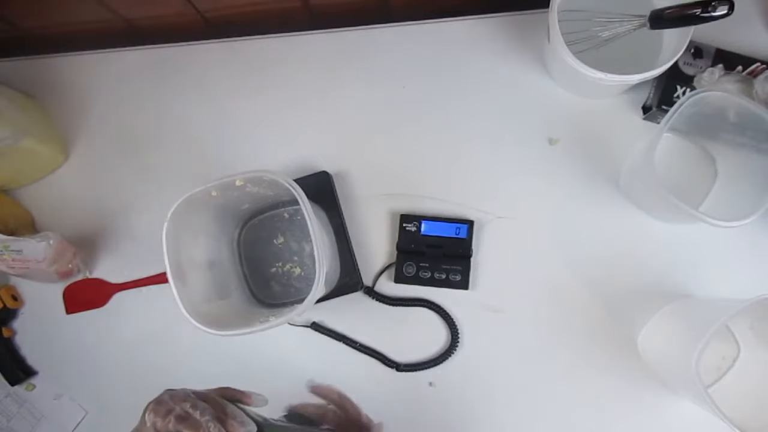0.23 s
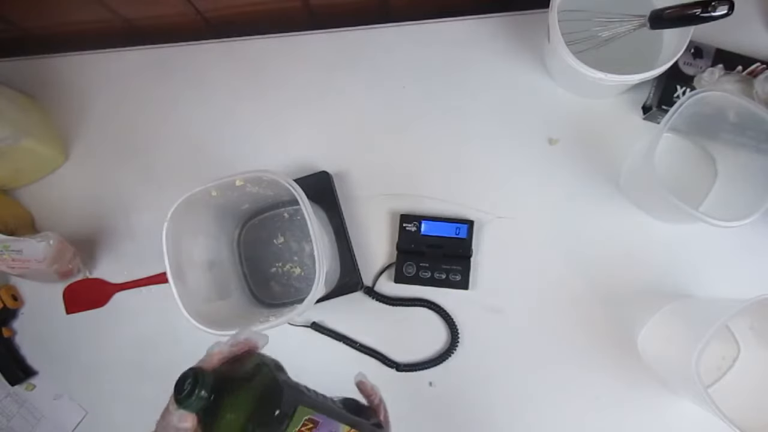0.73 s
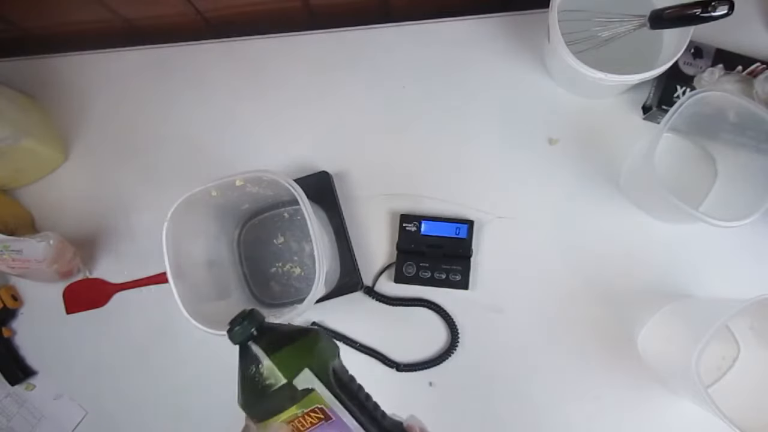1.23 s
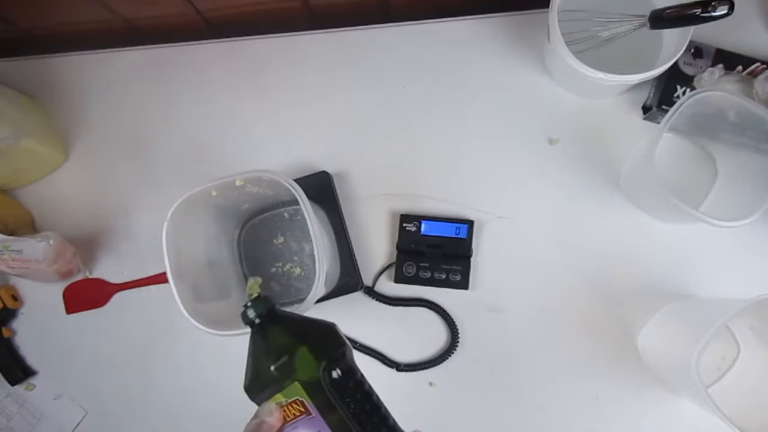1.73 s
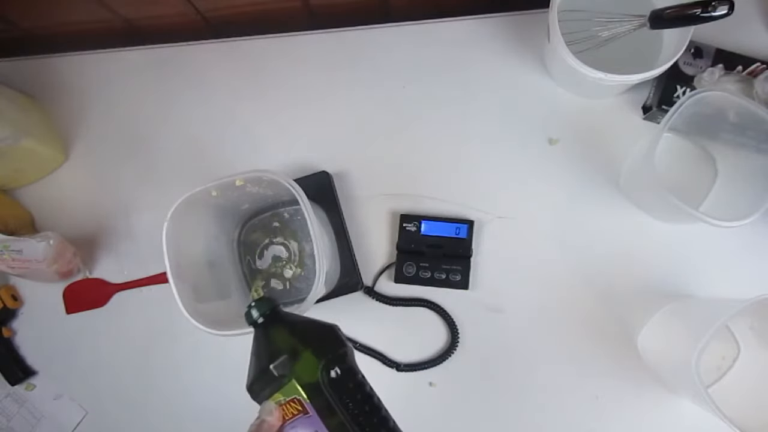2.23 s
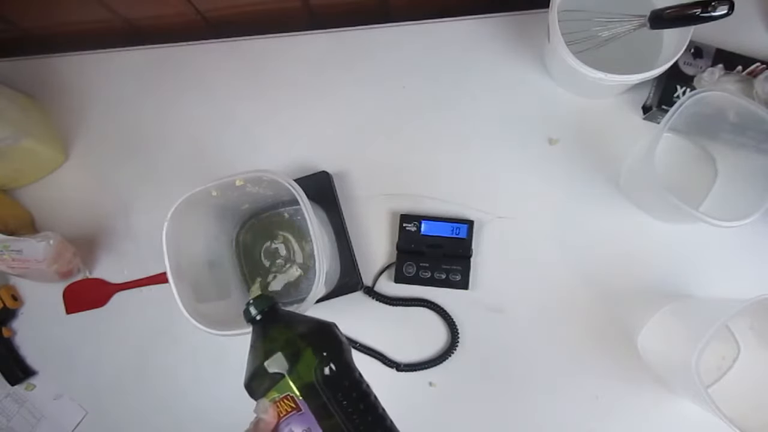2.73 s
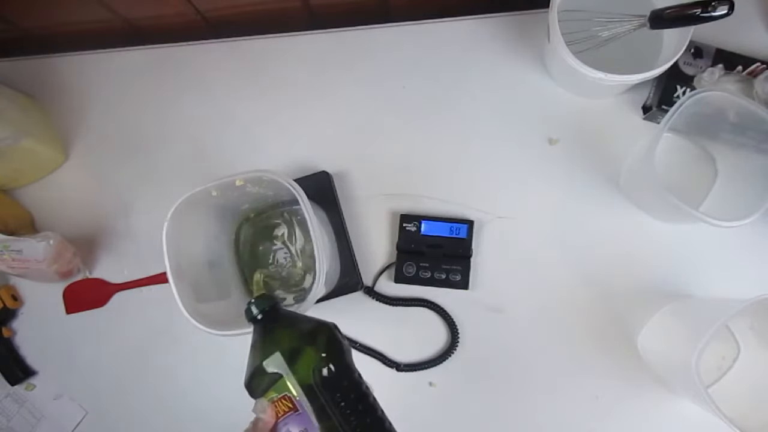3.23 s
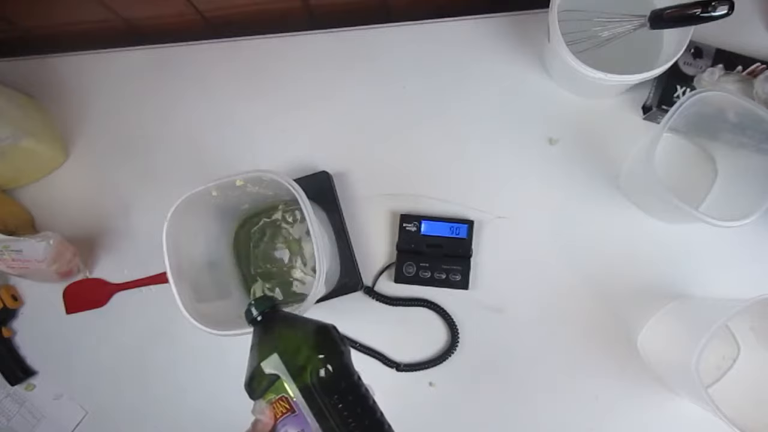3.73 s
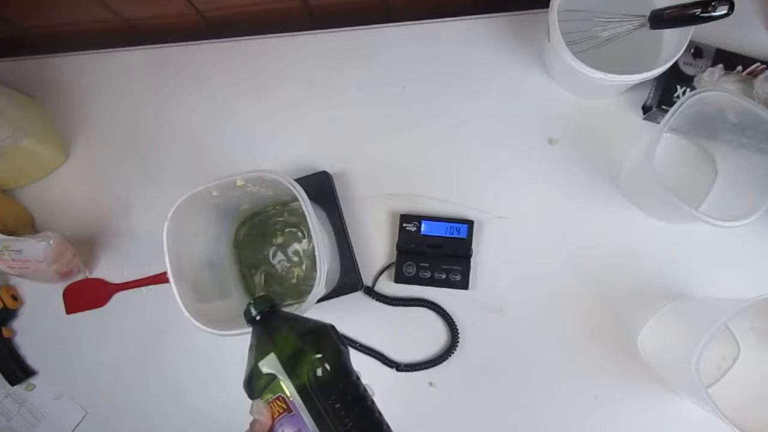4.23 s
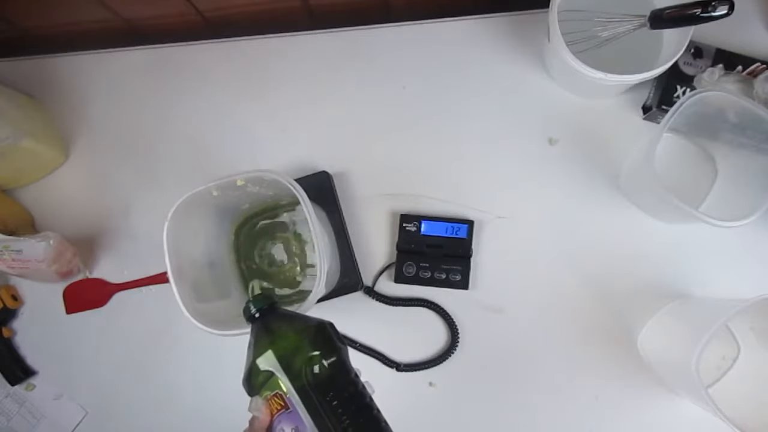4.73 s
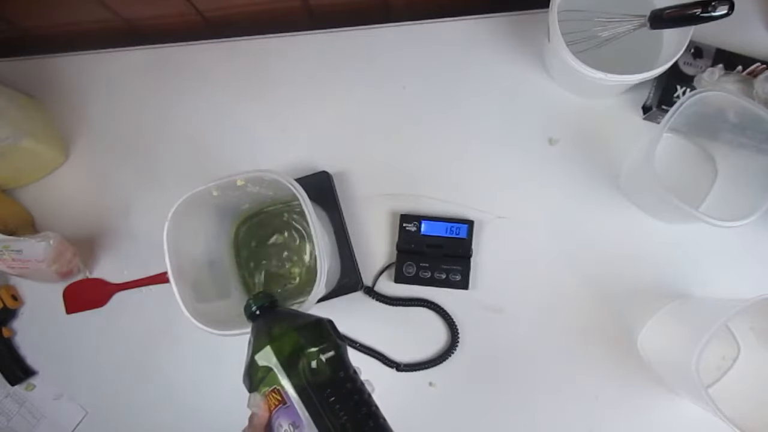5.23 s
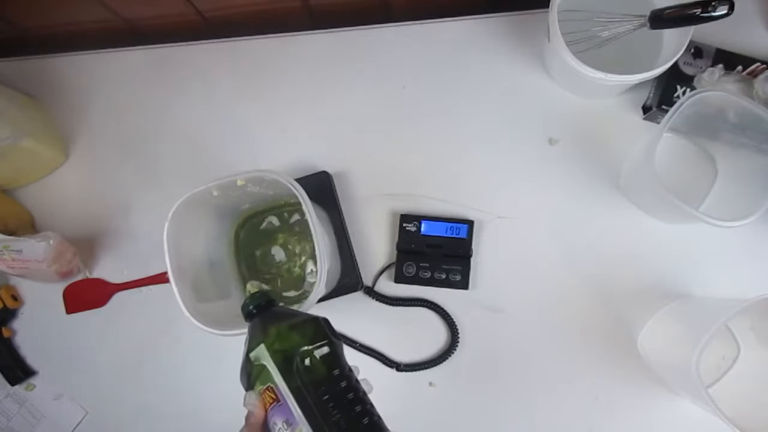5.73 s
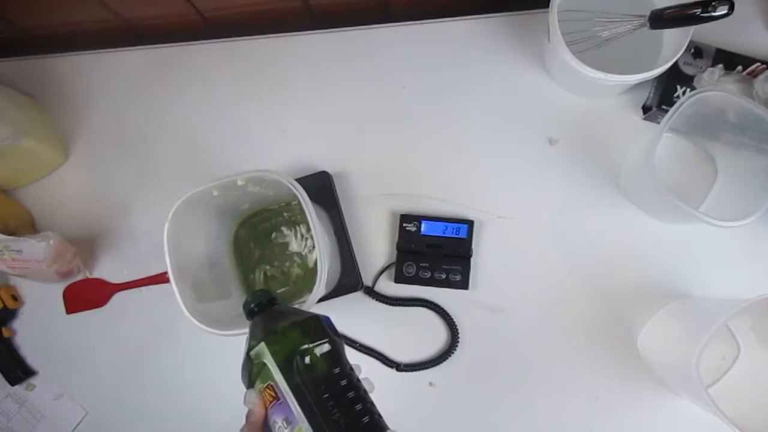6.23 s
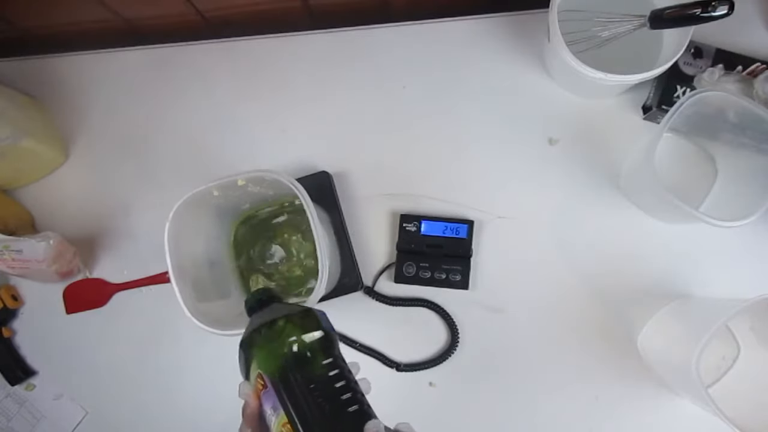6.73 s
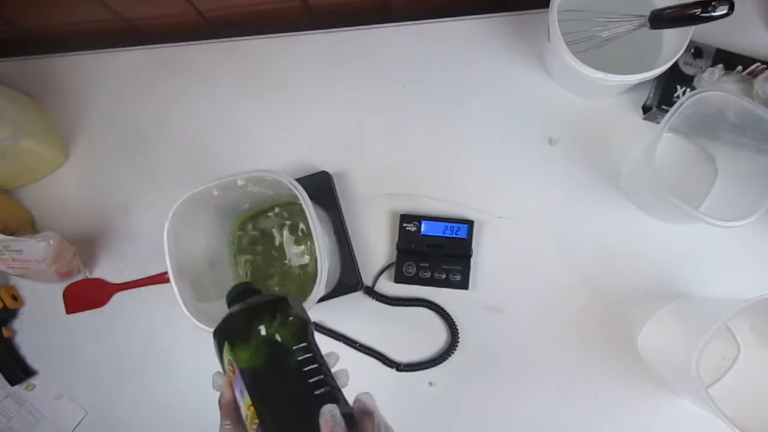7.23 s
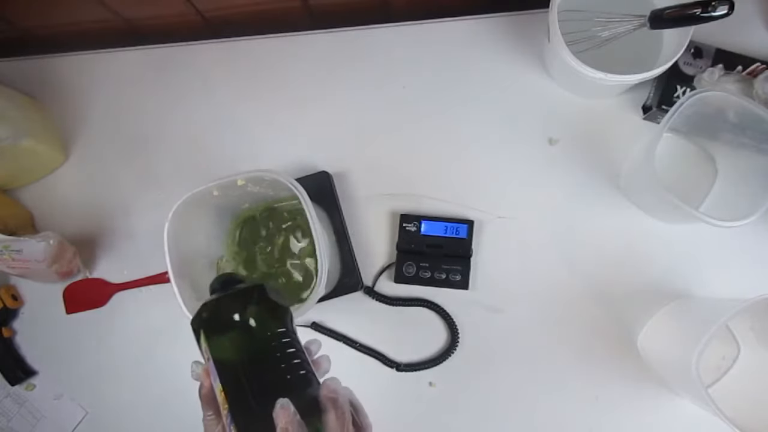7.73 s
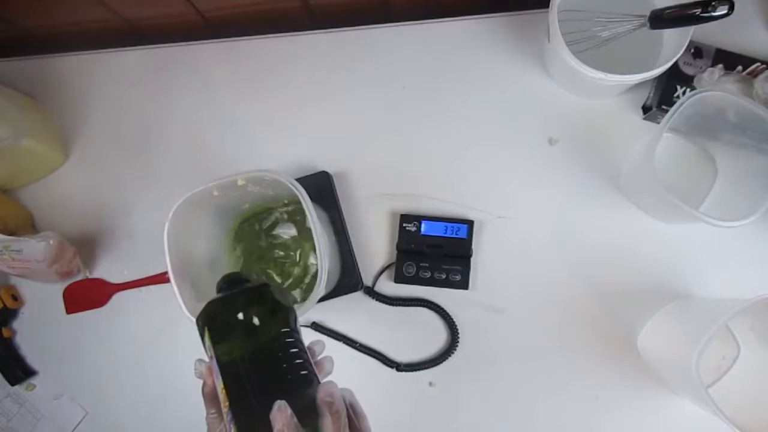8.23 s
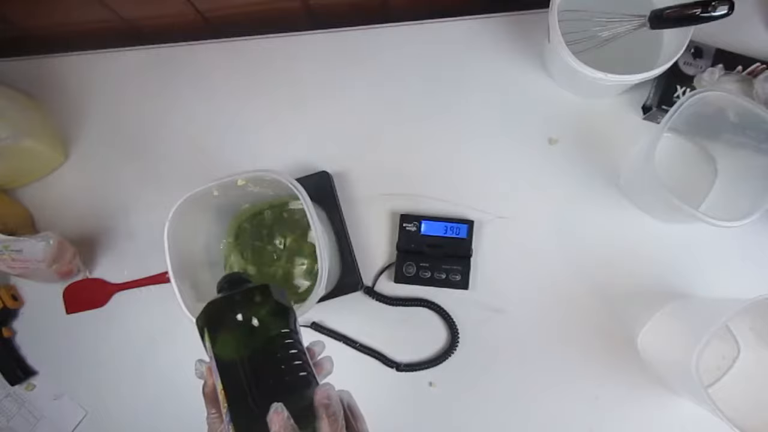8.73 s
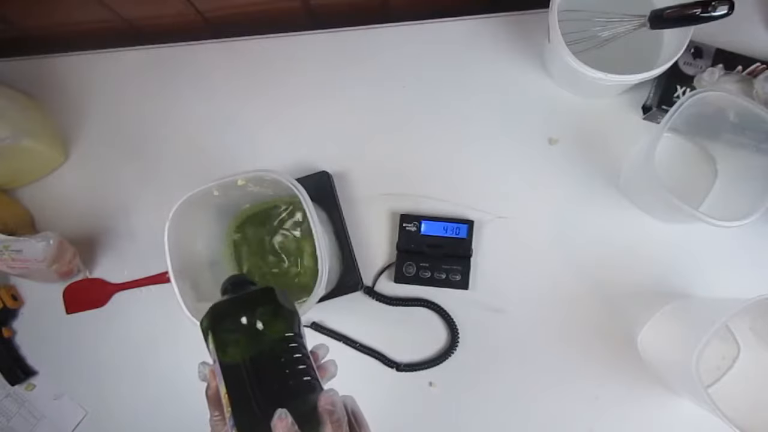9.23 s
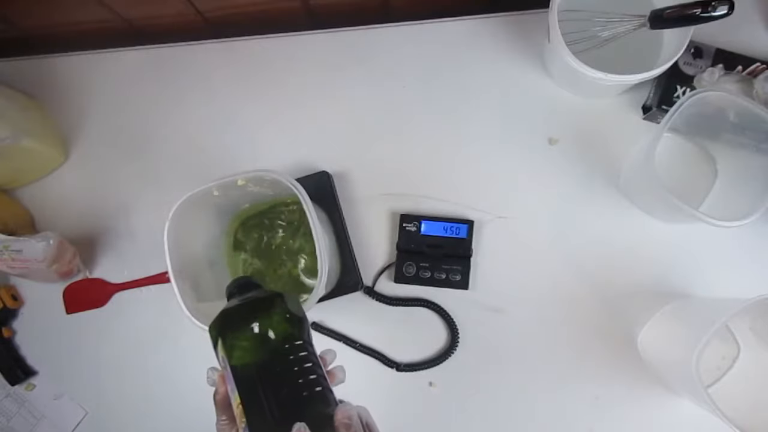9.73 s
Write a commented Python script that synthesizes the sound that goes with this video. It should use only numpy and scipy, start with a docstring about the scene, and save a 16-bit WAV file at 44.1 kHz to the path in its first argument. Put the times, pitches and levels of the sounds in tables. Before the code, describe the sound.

Over a low refrigerator hum, soft plastic knocks, then oil runs almost silently with stray bubble pops, until the bottle glugs and the pour turns spattery.

```python
"""A refrigerator hums in a kitchen throughout: coloured noise for the fan, wavering tones for the compressor
and the mains. First come dull knocks on plastic, filtered mode rings, as hands move and the first oil lands in
a tub. The smooth stream is almost silent but for single bubbles, short sines that glide, and dry noise snaps.
Then the bottle tips further: it gulps air with swelling low notes, and gush upon gush of oil spatters in grains
and noise, slaps, chirps and ticks to the end. Tub resonances and a room tail ring along."""
import sys
import numpy as np
from scipy import signal
from scipy.fft import rfft, irfft
from scipy.io import wavfile

SR = 44100
rng = np.random.default_rng(int(sys.argv[2]) if len(sys.argv) > 2 else 0)


def put_to_file(sound):
    """Save the sound as 16-bit audio at rate SR, in the file named by the first command-line argument."""
    columns = np.atleast_2d(sound).T  # one column per channel
    safe = np.clip(columns, -1, 1)
    whole_steps = np.round(safe * 32767)
    wavfile.write(sys.argv[1], SR, whole_steps.astype(np.int16))


N = 440559
EDGE_HZ = 15300  # upper band limit of the whole sound


def amp(db):
    """Decibels to gain."""
    return 10 ** (np.asarray(db) / 20)


def evened(x):
    """Scales to rms 1."""
    return x / np.sqrt(np.mean(x ** 2) + 1e-20)


def read(points, hz):
    """Reads a table on a log-frequency axis."""
    f, value = np.transpose(points)
    return np.interp(np.log(hz + 1), np.log(f + 1), value)


def add(mix, s, sound):
    """Adds a sound into the mix at time s, in place."""
    part = mix[max(round(s * SR), 0):][:len(sound)]
    part += sound[:len(part)]


def drift(hz):
    """A random curve of rms 1 that takes a new value hz times a second."""
    knots = rng.standard_normal(400)
    return evened(np.interp(np.arange(N) / SR * hz, np.arange(len(knots)), knots))


def band_noise(low_hz, high_hz):
    """Noise with gentle edges; rms 1."""
    noise = rng.standard_normal(N)
    return evened(signal.lfilter(*signal.butter(1, [low_hz, high_hz], "band", fs=SR), noise))


def wall_rattle(length, top_hz):
    """Dull noise of a shaking plastic wall; rms 1."""
    noise = rng.standard_normal(length)
    return evened(signal.lfilter(*signal.butter(2, top_hz, fs=SR), noise))


# colour of the steady fan rush: (frequency [Hz], relative level [dB])
RUSH_COLOUR = [(15, -45), (25, -17), (49, -2), (90, -2), (125, -7), (146, -12), (191, -17), (344, -6.5),
               (515, -12), (573, -7.5), (811, -17), (1960, -27.5), (2130, -25), (3350, -31), (15000, -45.5)]
# resonances that stand out of the rush: (frequency [Hz], width [Hz], boost [dB])
RUSH_RESONANCES = [(204, 35.4, 12), (329, 12, 0.5), (613.6, 18, 6), (1192, 205, 5), (7860, 240, 6)]
# slow swell of the rush: (time [s], level [dB])
RUSH_SWELL = [(0, 1), (.6, -0.5), (1.5, -1), (3, -1.5), (6, -0.5), (10, -1.5)]
# hum and whine of the compressor, with a mains hum near 120 Hz: (centre frequency [Hz], mid rms level [dB])
FRIDGE_TONES = [(58.5, -52.5), (119.8, -54), (360.7, -58.5), (583, -59), (2098, -58.5), (2157, -69.5),
                (2272, -66), (2331, -67)]
RUSH_DB = -41  # rms level before the swell


def refrigerator(waver_hz=0.782, waver_db=1.5):
    """Fan rush with a few resonances, under compressor and mains tones that waver in pitch and level."""
    t, hz = np.arange(N) / SR, np.fft.rfftfreq(N, 1 / SR)
    colour_db = read(RUSH_COLOUR, hz)
    for f, width, db in RUSH_RESONANCES:
        colour_db = colour_db + db / (1 + (2 * (hz - f) / width) ** 2)
    rush = evened(irfft(rfft(rng.standard_normal(N)) * amp(colour_db), N))
    swell_db = np.interp(t, *np.transpose(RUSH_SWELL))
    hum = np.zeros(N)
    for f, db in FRIDGE_TONES:
        level = amp(db + waver_db * drift(5.4)) * np.sqrt(2)  # rms to peak
        pitch = f + waver_hz * drift(8)
        hum += level * np.sin(2 * np.pi * np.cumsum(pitch) / SR)
    return amp(RUSH_DB + swell_db) * rush + hum


# how long the kitchen takes to fade by 60 dB: (frequency [Hz], time [s])
ROOM_T60 = [(100, 0.85), (500, 0.51), (2000, 0.25), (4500, 0.23), (8000, 0.29), (15000, 0.088)]
ROOM_DB, NEAR_DB, NEAR_T60_S = -13, -8, 0.045


def tail(near_s=0.00207, far_s=0.011):
    """Quick scatter off the things on the counter, then the decay of the kitchen, per frequency."""
    t = np.arange(SR // 2) / SR
    near, far = rng.standard_normal((2, len(t)))
    near = near * (t > near_s) * 1000. ** (-t / NEAR_T60_S)
    hz, when, z = signal.stft(far, SR, nperseg=256)
    fading = z * 1000. ** (-when / read(ROOM_T60, hz)[:, None])
    far = signal.istft(fading, SR, nperseg=256)[1][:len(t)] * (t > far_s)
    return amp(NEAR_DB) * near / np.linalg.norm(near) + amp(ROOM_DB) * far / np.linalg.norm(far)


def room(x, count=3):
    """Pops happen all over the pool, so they fade in turn among a few paths, at constant power."""
    turn = 2 * np.pi * np.arange(N) / SR
    wet = np.zeros(N)
    for k in range(count):
        share = np.sqrt(2 / count) * np.cos(turn + np.pi * k / count)
        wet += signal.oaconvolve(x * share, tail())[:N]
    return x + wet


# air resonances of the tub: (frequency [Hz], width [Hz], level [dB])
TUB_RESONANCES = [(1224, 34, 2), (1632, 19, 1), (1840, 15, 0), (2570, 58, -6), (2920, 64, -12),
                  (2860, 83, -23), (3226, 88, -9), (13700, 520, -16)]
# echoes from the tub wall, the counter and things on it: (delay [ms], gain [linear, signed])
CLOSE_ECHOES = [(3.4, -0.057), (5.1, 0.11)]


def tub(x):
    """The air in the tub rings after each pop, and close surfaces throw it back."""
    t = np.arange(SR // 8) / SR
    response = np.zeros(len(t))
    for hz, width, db in TUB_RESONANCES:
        gain = amp(db) * 2 * np.pi * width / SR  # narrow modes ring longer, so start softer
        response += gain * np.exp(-np.pi * width * t) * np.sin(2 * np.pi * hz * t)
    response[0] += 1  # direct sound
    for ms, gain in CLOSE_ECHOES:
        add(response, ms / 1000, np.array([gain]))
    return signal.oaconvolve(x, response)[:N]


# dull knocks on plastic, from the hands and from the first oil to land:
# (time [s], level [dB], frequency around which the blow is strongest [Hz])
KNOCKS = [(.885, -27, 230), (1.185, -26, 140), (1.917, -32.5, 480)]
# what the plastic rings with: (frequency [Hz], relative level [dB], decay time [ms])
PLASTIC_MODES = [(129.4, 3.5, 24.4), (209.7, -5, 32), (294, -3.5, 27), (383, 0, 6.7), (470, -1, 18),
                 (582, -0.5, 17), (700, 8, 7.6), (940, 0.5, 8), (1150, 6, 11)]


def knocks(swell_cycles=0.28, rattle_db=-8, rattle_ms=16, rattle_hz=900, blow_octaves=0.96):
    """A blow rings and rattles the plastic; each knock reaches the modes around its own frequency."""
    out, t = np.zeros(N), np.arange(SR // 4) / SR
    for s, db, centre_hz in KNOCKS:
        ring = np.zeros(len(t))
        for hz, level, ms in PLASTIC_MODES:
            envelope = (1 - np.exp(-t * hz / swell_cycles)) * np.exp(-t * 1000 / ms)
            ring += amp(level) * envelope * np.sin(2 * np.pi * (hz * t + rng.random()))
        rattle = wall_rattle(len(t), rattle_hz) * np.exp(-t * 1000 / rattle_ms)
        blow = ring + amp(rattle_db) * rattle
        edges = [centre_hz / 2 ** blow_octaves, centre_hz * 2 ** blow_octaves]
        add(out, s, amp(db) * signal.lfilter(*signal.butter(2, edges, "band", fs=SR), blow))
    return out


# air gulped into the bottle: (time [s], level [dB], swell time [ms])
GULPS = [(6.783, -23.5, 5.5), (6.865, -23, 22), (6.92, -25, 5.2), (8.437, -28, 12)]
GULP_HZ, GULP_DECAY_MS = 75.5, 29.5
GULP_OVERTONE_HZ, GULP_OVERTONE_DB = 211.5, -13.5


def gulps(rattle_db=-12, rattle_hz=260):
    """The bottle booms as it takes in air: a low note and one overtone swell and die, its wall rattles."""
    out, t = np.zeros(N), np.arange(SR // 3) / SR
    for s, db, swell_ms in GULPS:
        envelope = (1 - np.exp(-(t * 1000 / swell_ms) ** 2)) * np.exp(-t * 1000 / GULP_DECAY_MS)
        note = np.sin(2 * np.pi * GULP_HZ * t)
        overtone = amp(GULP_OVERTONE_DB) * np.sin(2 * np.pi * GULP_OVERTONE_HZ * t)
        rattle = amp(rattle_db) * wall_rattle(len(t), rattle_hz)
        add(out, s, amp(db) * envelope / envelope.max() * (note + overtone + rattle))
    return out


def snap(hz, decay_ms, octaves=0.46, size=1024):
    """A click and a burst of noise that dies at once, coloured by one broad resonance; peak 1."""
    burst = rng.standard_normal(size) * np.exp(-np.arange(size) / SR * 1000 / decay_ms)
    burst[0] = 4  # the click
    edges = np.minimum([hz / 2 ** octaves, hz * 2 ** octaves], [SR / 4, EDGE_HZ])
    burst = signal.lfilter(*signal.butter(2, edges, "band", fs=SR), burst)
    return burst / abs(burst).max()


# the loudest snaps of oil film and bottle plastic:
# (time [s], peak level [dB], centre frequency [Hz], decay time of the burst [ms])
SNAPS = [ (3.678, -29.5, 8000, .6), (3.9341, -33, 6000, .6), (4.2713, -24, 2030, 1.4),
         (4.276, -29.5, 8000, 1.8), (5.0437, -22, 2600, 3.1), (5.044, -17.5, 8540, 1.1),
         (6.2284, -14.5, 9200, 0.89), (6.3355, -26.5, 6140, .86), (6.523, -35, 4400, 7.6),
         (6.897, -22, 6860, .81), (7.353, -12, 4800, 0.52), (7.5224, -19.5, 9300, 6.8),
         (7.7105, -17, 3600, 0.5), (7.8243, -22.5, 2540, 1.1), (7.839, -21.5, 10000, 1.7),
         (8.1432, -12, 10600, 1.1), (8.2037, -15.5, 6560, .67), (8.6988, -19, 12500, .69),
         (8.7855, -19.5, 7260, 0.92), (8.8705, -19.5, 11000, 1), (9.1851, -1.5, 3900, 0.046),
         (9.1852, -14, 12700, .35), (9.387, -20, 12600, 0.92), (9.5749, -15.5, 6500, 0.27)]


def snaps():
    """Single sharp ticks without a pitch: film or plastic snaps as a brief noise burst."""
    out = np.zeros(N)
    for s, db, hz, decay_ms in SNAPS:
        add(out, s, amp(db) * snap(hz, decay_ms))
    return out


def ping(hz, decay_ms, rise, open_ms=0.071, shape=1.46, hurry_ms=7, runaway_s=0.057, size=2600):
    """A bursting bubble: its cavity rings, its pitch glides ever faster, soonest if short-lived; peak near 1."""
    t = np.arange(size) / SR
    hurry = max(1, hurry_ms / decay_ms)
    octaves = rise * t * (1 + t / runaway_s) * hurry  # a positive rise climbs as the hole widens
    pitch = np.minimum(hz * 2 ** np.minimum(octaves, 2), SR / 2)
    envelope = (1 - np.exp(-t * 1000 / open_ms)) * np.exp(-(t * 1000 / decay_ms) ** shape)
    return envelope / envelope.max() * np.sin(2 * np.pi * np.cumsum(pitch) / SR)


def patter(per_s, centre_hz, octaves, cycles, spread_db, fizzy=False, count=40):
    """Small bubbles of random size burst at random moments, each with a note or a fizz; rms 1."""
    out = np.zeros(N)
    for pitch, length, rise in rng.standard_normal((count, 3)):
        hz = min(centre_hz * 2 ** (octaves * pitch), EDGE_HZ)
        decay_ms = 1000 * cycles * 2 ** (.5 * length) / hz
        grain = snap(hz, decay_ms, octaves=.2) if fizzy else ping(hz, decay_ms, 24 * abs(rise))
        for place, chance in rng.random((rng.poisson(per_s * N / SR / count), 2)):
            boost_db = -spread_db * np.log(max(chance, .04))  # few loud, many soft
            add(out, place * N / SR, amp(boost_db) * grain)
    return evened(out)


# spatter between gushes, silent before the first point: (time [s], level [dB])
CHURN = [(6.7, -54.5), (7.2, -55), (8.5, -47.5), (9.7, -50.5), (9.85, -71)]
# gushes that land in the pool, in quick succession once the bottle gulps: (time [s], level [dB])
GUSHES = [ (5.05, -44.5), (6.758, -45), (6.807, -45.5), (7.016, -47), (7.183, -37.5), (7.25, -41),
          (7.295, -42.5), (7.435, -46.5), (7.524, -33.5), (7.575, -44), (7.711, -42), (7.823, -46.5),
          (7.94, -38), (8.041, -40.5), (8.149, -38), (8.262, -36), (8.285, -36.5), (8.461, -35),
          (8.5, -32.5), (8.669, -37.5), (8.754, -35), (8.855, -35.5), (8.975, -37.5), (9.053, -33.5),
          (9.176, -39.5), (9.258, -47.5), (9.445, -38), (9.54, -42), (9.577, -41), (9.65, -36.5),
          (9.726, -44.5), (9.837, -42.5), (9.946, -40.5)]
SPLASH_S, SPLASH_RISE_S = 0.018, 0.0013  # how long a gush spatters, how fast it lands
TRICKLE_DB, TRICKLE_PER_S = -65.5, 8
# levels relative to the force of the gushes and churn
SPATTER_DB, SPATTER_PER_S, SPRAY_DB, SPRAY_PER_S, SLOSH_DB = -3, 500, -10.5, 220, -7
CHIRP_DB, CHIRP_PER_S, HOLLOW_DB, HOLLOW_HZ, HOLLOW_WIDTH_HZ = -2, 110, -12.5, 213, 20


def stream(slosh_low_hz=60, slosh_high_hz=520):
    """Sparse tiny bubbles as the oil runs; each gush throws spatter and spray and sloshes the pool."""
    t = np.arange(N) / SR
    age = t[:SR // 3]
    gush = (1 - np.exp(-age / SPLASH_RISE_S)) * np.exp(-age / SPLASH_S)
    force = amp(np.interp(t, *np.transpose(CHURN), left=-120))
    for s, db in GUSHES:
        add(force, s, amp(db) * gush / gush.max())
    spatter = amp(SPATTER_DB) * patter(SPATTER_PER_S, 2466, 0.62, 3.0, 4.0, count=60)
    chirps = amp(CHIRP_DB) * patter(CHIRP_PER_S, 2917, 0.452, 7.4, 6.2)
    spray = amp(SPRAY_DB) * patter(SPRAY_PER_S, 8200, 0.61, 3.4, 7.6, fizzy=True)
    slosh = amp(SLOSH_DB) * band_noise(slosh_low_hz, slosh_high_hz)
    half_width = HOLLOW_WIDTH_HZ / 2
    hollow = amp(HOLLOW_DB) * band_noise(HOLLOW_HZ - half_width, HOLLOW_HZ + half_width)  # the bottle's air hums with each gush
    running = np.interp(t, [2.7, 3.5], [0, 1])  # fades in over these seconds
    trickle = running * amp(TRICKLE_DB) * patter(TRICKLE_PER_S, 2240, 0.416, 5, 3.4)
    return force * (spatter + chirps + spray + slosh + hollow) + trickle


def brood(number, count=4):
    """Chance for what a gush throws off: presence 0-1, three normal deviations, a delay 0-1 for each."""
    presence = np.clip(number - np.arange(count), 0, 1)
    deviations = np.clip(rng.standard_normal((count, 3)), -2, 2)
    return zip(presence, deviations, rng.random(count))


# levels below are relative to the gush
LANDING_DB, LANDING_HZ, LANDING_MS = 9, 1320, 2.4  # the slap with which a gush lands
TRAPPED_PER_GUSH, TRAPPED_DB = 2, 9  # bubbles that a gush drags under
# pitch, its spread, decay time, base glide in octaves per s (short-lived bubbles hurry it)
TRAPPED_HZ, TRAPPED_OCTAVES, TRAPPED_MS, TRAPPED_RISE = 1964, .42, 3.2, 16
SURFACING_S = .06  # they come up and burst within this time
# droplets that a gush flings up, back within the flight time
DROPS_PER_GUSH, DROPS_DB, DROPS_HZ, DROPS_OCTAVES, DROPS_MS, FLIGHT_S = 3, 8.5, 5870, 0.83, .4, 0.091
BROOD_SPREAD_DB = 1.5  # level spread of bubbles and droplets alike


def aftermath(tick_octaves=0.37):
    """Each gush slaps, drags bubbles under that surface and chirp, and flings droplets that tick back down."""
    out = np.zeros(N)
    for s, db in GUSHES:
        add(out, s, amp(db + LANDING_DB) * snap(LANDING_HZ, LANDING_MS, octaves=0.88))
        for share, (pitch, length, size), delay in brood(TRAPPED_PER_GUSH):
            hz = TRAPPED_HZ * 2 ** (TRAPPED_OCTAVES * pitch)
            chirp = ping(hz, TRAPPED_MS * 2 ** (.5 * length), TRAPPED_RISE)
            level = share * amp(db + TRAPPED_DB + BROOD_SPREAD_DB * size)
            add(out, s + SURFACING_S * delay, level * chirp)
        for share, (pitch, length, size), delay in brood(DROPS_PER_GUSH):
            hz = min(DROPS_HZ * 2 ** (DROPS_OCTAVES * pitch), EDGE_HZ)
            tick = snap(hz, DROPS_MS * 2 ** (.5 * length), tick_octaves)
            level = share * amp(db + DROPS_DB + BROOD_SPREAD_DB * size)
            add(out, s + FLIGHT_S * delay, level * tick)
    return out


# the loudest bubbles that burst and ring: (time [s], level of the note [dB], starting pitch [Hz],
# decay time [ms], base glide [octaves/s], which short-lived bubbles hurry)
BUBBLES = [ (1.9163, -12.5, 3070, 0.72, -1), (3.0762, -12.5, 1883, 9.7, 30.5),
           (3.4825, -28, 2190, 0.96, 16), (3.679, -24.5, 3605, 3.6, 4), (3.873, -39.5, 4400, 5.9, 3),
           (4.061, -35, 1520, 6.3, 36), (4.2205, -32.5, 2040, 5.1, 11), (4.6236, -26, 1860, 4.4, -9),
           (5.023, -19.5, 2155, 4.1, -1), (5.416, -14.5, 1710, 2.5, -8), (5.4192, -15.5, 3440, 0.89, 0),
           (6.031, -19, 1740, 5.6, 7), (6.2178, -24, 1640, 0.96, 5), (6.2291, -7, 2590, 3.1, -20),
           (6.3441, -25, 3840, 1.4, 0), (6.7583, -18.5, 1650, 1.1, 10), (6.767, -30, 1146, 10, 9),
           (6.8068, -18, 2050, 3.5, 23), (7.0214, -15.5, 2780, 0.89, 15), (7.111, -29.5, 2020, 7.6, 35),
           (7.1835, -18.5, 1430, 1.8, 4), (7.1987, -19.5, 4750, 1.7, -11), (7.328, -15, 2600, 0.61, 22),
           (7.3778, -20.5, 3220, 4.6, 13), (7.3916, -23.5, 2000, 6, 41), (7.436, -9, 3830, 0.51, 4),
           (7.5423, -21.5, 1917, 8.2, 11), (7.747, -20, 3620, 0.62, 3), (7.7678, -24.5, 1674, 6.2, 9),
           (7.9341, -8.5, 2740, 1.4, 6), (7.9559, -17.5, 1960, 2.3, 14), (8.1375, -10.5, 2450, 3.5, 42.5),
           (8.1761, -20, 2060, 2.6, 10), (8.3213, -23, 1820, 16, 20.5), (8.482, -21.5, 2550, 5.4, 9),
           (8.501, -12, 2520, 2.1, 12), (8.5312, -16, 3080, 3, 9), (8.7277, -23, 3530, 1.5, 32),
           (8.9323, -17, 2960, 2.4, 29), (8.9662, -22.5, 2070, 2.6, 13), (8.9958, -13, 3900, 0.99, 35),
           (9.155, -8, 1960, 3.6, 55), (9.1855, -21, 890, 4.3, 3), (9.328, -27.5, 2160, 3.9, 50),
           (9.5749, -9, 2240, 1.5, -9), (9.6497, -22, 1744, 1.2, 10), (9.722, -21.5, 1780, 2.5, 12),
           (9.7419, -20, 1840, 2.8, 39), (9.7606, -3, 3480, 1.3, 58), (9.9653, -12, 4330, 0.59, 1)]


def bubbles(tear_db=-16.5, tear_hz=7500, tear_ms=0.6, wet_db=-8.0, wet_ratio=1.395, wet_limit_ms=3.6):
    """Each bubble starts with the tick of its tearing film; a wet crackle dies along with its note."""
    out = np.zeros(N)
    for s, db, hz, decay_ms, rise in BUBBLES:
        note = ping(hz, decay_ms, rise)
        tear = snap(tear_hz, tear_ms, octaves=0.49)
        crackle = snap(hz * wet_ratio, min(decay_ms, wet_limit_ms), octaves=0.39)
        add(out, s, amp(db) * note)
        add(out, s, amp(db + tear_db) * tear)
        add(out, s, amp(db + wet_db) * crackle)
    return out


def scene():
    """Oil and bottle in the kitchen; the low gulps hardly stir the room, so they stay dry."""
    oil = tub(bubbles() + snaps() + stream() + aftermath())
    return (room(oil + knocks()) + gulps() + refrigerator())[None]


def record(dry):
    """Full-scale limit, then the band limit."""
    lowpass = signal.firwin(401, EDGE_HZ, window=("kaiser", 9), fs=SR)
    return signal.oaconvolve(np.clip(dry, -1, 1), lowpass[None], "same")


dry = scene()
out = record(dry)
put_to_file(out)
```